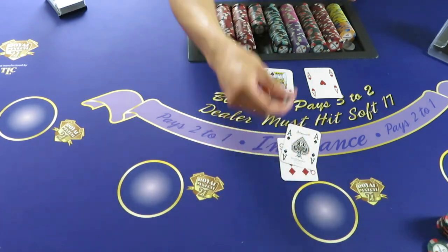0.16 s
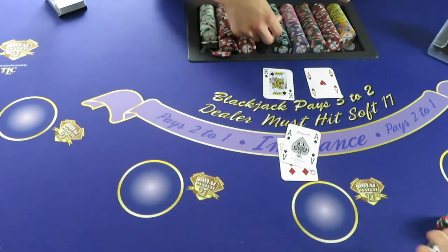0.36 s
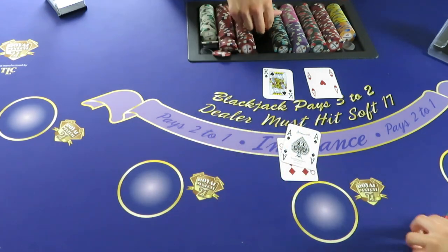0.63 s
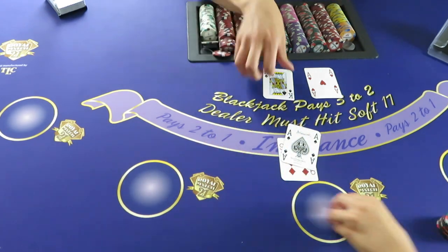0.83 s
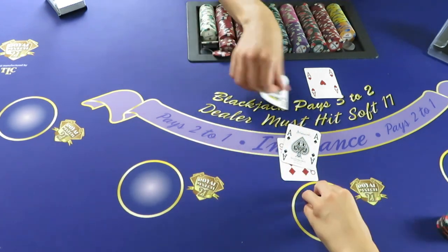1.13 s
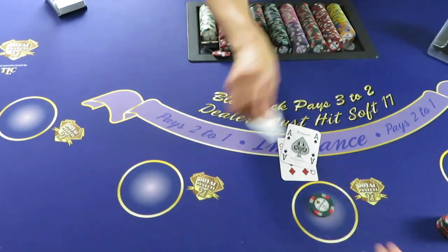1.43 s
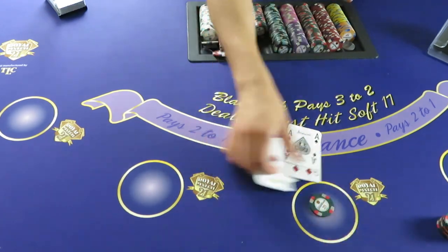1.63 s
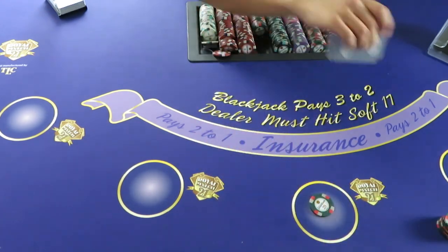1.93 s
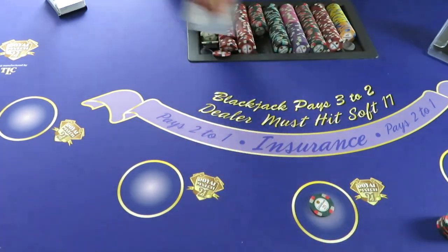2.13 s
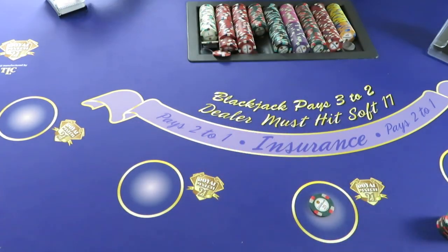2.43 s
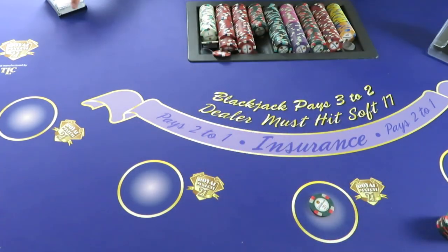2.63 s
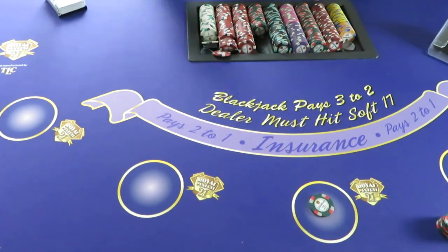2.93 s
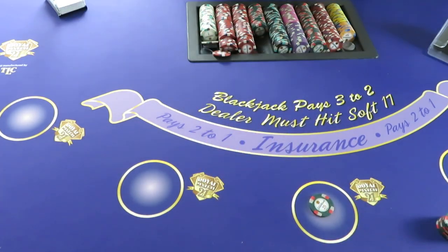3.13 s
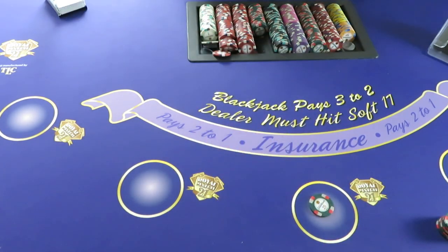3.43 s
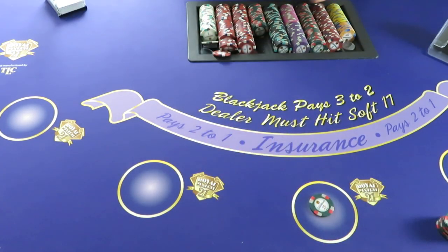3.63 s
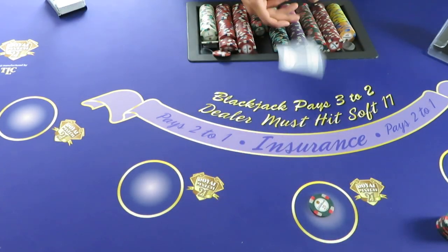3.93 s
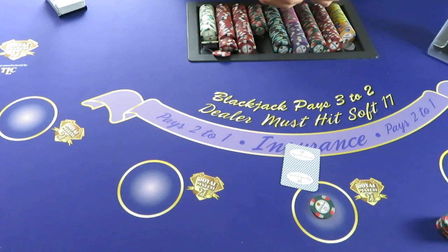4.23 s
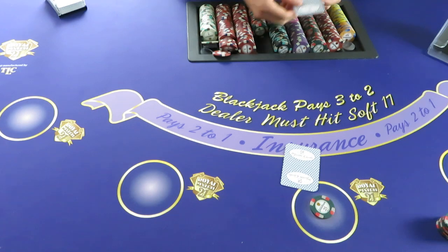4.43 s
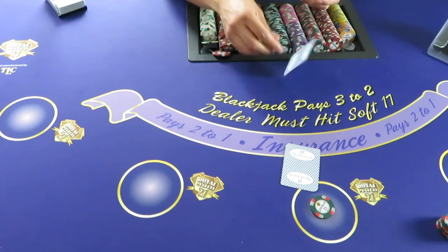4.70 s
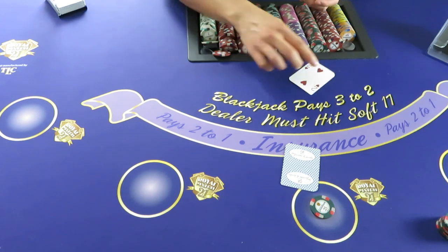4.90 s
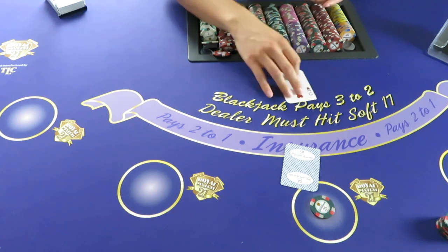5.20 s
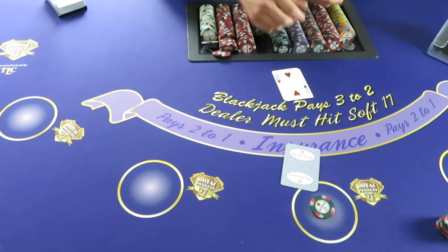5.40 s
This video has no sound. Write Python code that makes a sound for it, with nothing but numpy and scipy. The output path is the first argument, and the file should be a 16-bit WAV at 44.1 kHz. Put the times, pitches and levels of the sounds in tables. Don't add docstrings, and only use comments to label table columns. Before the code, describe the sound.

Close casino-table handling: clipped chip crash, papery card slides, bright ringing tray clack, a sharp card snap and soft card taps over faint ventilation.

```python
import sys
import numpy as np
from scipy import signal
from scipy.fft import rfft, irfft, next_fast_len
from scipy.io import wavfile
from scipy.ndimage import uniform_filter1d

SR = 44100
rng = np.random.default_rng(int(sys.argv[2]) if len(sys.argv) > 2 else 0)


def unload_audio(sound):
    columns = np.transpose(np.atleast_2d(sound))
    steps = np.round(np.clip(columns, -1, 1) * 32767)
    wavfile.write(sys.argv[1], SR, steps.astype(np.int16))


def boost(x):
    u = np.asarray(x, float) / 20
    return 10 ** u


N = 245107

# [t/s, peak level/dB, body f/Hz, rattle/ms]
BLOWS = [
    (.6831, 7, 660, 2.2),
    (.684, -29, 50, .5),
    (.611, -43, 240, 6.0),
    (.8185, -38, 300, 7.0),
]
# [f/Hz, level/dB, T60/s]
TABLE_MODES = [(200, -7, 0.4), (313, 1, 0.071), (540, -14.5, 0.05), (800, 0.5, 0.13)]


def curve(table, column=1, outside=None):
    rows = np.array(table)
    return np.interp(np.arange(N) / SR, rows[:, 0], rows[:, column], outside, outside)


def band(x, hz, width_hz):
    centre_hz = min(hz, .4 * SR)
    q = max(hz / width_hz, .3)
    return signal.lfilter(*signal.iirpeak(centre_hz, q, SR), x)


def colour(x, table):
    rows = np.array(table)
    size = next_fast_len(N)
    hz = np.maximum(np.fft.rfftfreq(size, 1 / SR), 1)
    gain = boost(np.interp(np.log(hz), np.log(rows[:, 0]), rows[:, 1]))
    return irfft(rfft(x, size) * gain)[..., :N]


def unit(x):
    return x / np.sqrt(np.mean(x ** 2))


def walk(rate_hz):
    hold = int(SR / rate_hz)
    levels = rng.standard_normal(N // 21 + 1)[:N // hold + 1]
    return unit(uniform_filter1d(np.repeat(levels, hold), hold)[:N])


def late(x, count):
    return np.pad(x, (count, 0))[:N]


def gain_db():
    # [t/s, depth/dB]
    ducks = [
        (.212, -1),
        (.604, 1),
        (.670, -17),
        (.80, -0.1),
        (2.46, -4),
        (2.812, 1.3),
        (4.206, -0.7),
    ]
    rest_db, duck_s, hold_s, recover_s = 0.5, .002, 0.076, 0.87
    since_s = np.arange(N) / SR - np.array(ducks)[:, :1]
    drop = np.clip(since_s / duck_s, 0, 1)
    recovery = np.exp(-np.maximum(since_s - hold_s, 0) / recover_s)
    return rest_db + np.array(ducks)[:, 1] @ (drop * recovery)


def knocks(table, width_share, share_per_ms, crack_2k_db, modes=(), ring_db=-20.):
    out, t = np.zeros(N), np.arange(6000) / SR
    before_gain_db = -gain_db()
    for s, db, hz, ms in table:
        width_hz = hz * (width_share + share_per_ms * ms)
        crack_db = crack_2k_db + 6.5 * np.log2(hz / 2000)
        grains = rng.standard_normal((3, len(t)))
        fade = np.exp(-1000 * t / max(ms, .05))
        body = min(ms, 1) * grains[0] * grains[1] * fade
        body[0] += 3.0
        for _ in range(3):
            body = band(body, hz, 2 * width_hz)
        crack = grains[2] * grains[1] * fade ** 2
        crack = band(band(crack, 10000, 7400), 10000, 9000)
        sound = body / np.abs(body).max() + boost(crack_db) * crack / np.abs(crack).max()
        i = int(s * SR)
        out[i:i + len(t)] += boost(db + before_gain_db[i + 40]) * sound
    ring = 0
    for hz, db, t60_s in modes:
        ring = ring + boost(db) * band(out, hz, np.log(1000) / np.pi / t60_s)
    return out + boost(ring_db + 3.8 * walk(70)) * ring


def air():
    # [f/Hz, density/dB]
    spectrum = [(20, -5), (40, -4.5), (80, -1), (141, -7.5), (280, -1.5), (390, -5.5), (540, -4.5),
                (900, -9), (1300, -9.5), (2100, -10.5), (3500, -14.5), (6000, -16.5), (10000, -25),
                (15000, -29)]
    steady = unit(colour(rng.standard_normal(N), spectrum))
    bass = band(steady, 60, 120)
    return boost(-58.5) * (steady + bass * (boost(2.3 * walk(6.6)) - 1))


def air_side():
    # [f/Hz, density/dB]
    spectrum = [(20, -25.5), (40, -12), (400, 1.5), (1000, -5.5), (2000, -9.5), (4000, -14), (8000, -21),
                (15000, -21)]
    hush = unit(colour(rng.standard_normal(N), spectrum))
    again = colour(late(hush, count=25), [(3000, -0.5), (7000, -5.5), (10000, -19)])
    return boost(-66.5) * (hush + again)


def drone():
    # [t/s, f/Hz, level/dB]
    engine = [(0, 84, -65.5), (.6, 86.5, -61), (.9, 89.9, -74.5), (1.3, 92.3, -72.5), (1.9, 93.2, -75),
              (2.2, 95, -65.5), (2.45, 93.3, -63), (2.72, 90.8, -60.5), (2.84, 82, -74), (3.0, 80, -72.5),
              (3.3, 75, -106)]
    hz = curve(engine) * (1 + 0.012 * walk(6.0))
    phase = 2 * np.pi * np.cumsum(hz) / SR
    level_db = curve(engine, column=2, outside=-120) - gain_db() + 0.66 * walk(8.2)
    return np.sqrt(2) * boost(level_db) * np.sin(phase)


def felt():
    # [t/s, level/dB]
    strokes = [
        [(0, -48.5), (.2, -50), (.26, -51), (.354, -62), (.44, -85.5)],
        [(1.2, -69), (1.264, -55), (1.39, -47), (1.43, -52.5), (1.5, -79.5)],
        [(1.555, -70), (1.595, -47.5), (1.65, -51.5), (1.78, -43.5), (1.88, -53.5), (1.93, -84)],
        [(5.15, -80), (5.18, -57), (5.26, -54.5), (5.45, -76)],
    ]
    # [scrape f/Hz, rustle level/dB, hiss level/dB]
    paper = [(2000, -1, -1.4), (2021, -18.5, -8.5), (2103, -14.5, -8), (2600, -14.5, -6.5)]
    # [t/s, level/dB]
    shoe_draw = [(2.95, -78), (3.1, -64.5), (3.5, -66.5), (3.9, -62), (4.0, -85)]
    hiss_hz, hiss_width_hz = 10500, 7500
    out = 0
    for stroke, (hz, rustle_db, hiss_db) in zip(strokes, paper):
        db = curve(stroke, outside=-120)
        grip = boost(2.2 * walk(60) + 1.1 * walk(300))
        scrape, rustle, hiss, drag = rng.standard_normal((4, N))
        drag = unit(band(drag, 920, 710))
        scrape = unit(band(band(scrape, hz, 1700), hz, 1700))
        rustle = unit(band(rustle, 5600, 2700))
        hiss = unit(band(band(hiss, hiss_hz, hiss_width_hz), hiss_hz, hiss_width_hz))
        out = out + boost(db - 13.5) * grip * drag
        out = out + boost(db - 6.0) * grip * scrape
        out = out + boost(db + rustle_db - 4.5) * grip * rustle
        out = out + boost(db + hiss_db - 8.0) * hiss
    shoe_db = curve(shoe_draw, outside=-120) + 1.9 * walk(3.93)
    shoe = unit(band(rng.standard_normal(N), 2080, 200)) * boost(shoe_db)
    return (out + shoe) / boost(gain_db())


def chips():
    # [t/s, peak level/dB, body f/Hz, rattle/ms]
    clicks = [(.217, -30, 6300, 16), (.2195, -25.5, 9700, 2.6), (.609, -26, 2730, 4.6),
              (.610, -34, 6600, 5), (.610, -29, 1550, 12), (.684, -13, 9500, 3), (.710, -38, 8000, 1),
              (.719, -36, 8000, 1), (.732, -29, 10000, 1.5), (.742, -19, 3500, 4.1), (.743, -16, 6900, 1.6),
              (.755, -29, 9000, 9)]
    # [f/Hz, level/dB, T60/s]
    chip_modes = [(5580, -9, 0.077), (5950, -2.5, 0.17), (6620, -0.5, .2)]
    return knocks(clicks, width_share=0.37, share_per_ms=.001, crack_2k_db=-15, modes=chip_modes, ring_db=7.0)


def table_blows():
    return knocks(BLOWS, width_share=1.1, share_per_ms=0, crack_2k_db=-20)


def rack():
    # [t/s, peak level/dB, body f/Hz, rattle/ms]
    drops = [(.677, -31, 2160, 3), (.6805, -29, 2170, 1.8), (.684, -11, 1900, 4.8), (.8078, -23, 2700, 1.6),
             (.686, -30, 340, 10), (.690, -19.5, 724, 22), (.694, -24, 2354, 82), (.8075, -12, 1170, .15),
             (.8185, -11.5, 1160, 0.37), (.8188, -20, 2900, 2.5), (.828, -24, 850, 4),
             (.826, -33, 2600, 24), (.850, -23.5, 1310, 0.77), (.871, -25, 1414, .4),
             (.878, -31, 1370, 4.9), (.92, -43.5, 1090, 11)]
    # [f/Hz, level/dB, T60/s]
    rack_modes = [(328, -13.5, 0.097), (546, -13.5, 0.11), (788.5, -6, 0.13), (1260, -8, 0.049),
                  (1534, -2.5, 0.057), (2140, 1.5, 0.036)]
    return knocks(drops, width_share=.4, share_per_ms=.008, crack_2k_db=-36, modes=rack_modes, ring_db=-2.5)


def cards():
    # [t/s, peak level/dB, body f/Hz, rattle/ms]
    landings = [(1.385, -46, 1488, 5.6), (1.36, -63, 143.5, 22), (1.640, -52, 70, 27),
                (1.945, -49, 2000, 12.3), (3.085, -57, 9240, 3), (3.844, -52, 8730, 1.7),
                (3.949, -39, 1800, 3), (4.134, -51, 1300, 4.7), (4.157, -38, 1800, 12),
                (4.159, -48, 11000, .82), (4.189, -53, 2680, 4.2), (4.310, -58, 10000, 14),
                (4.430, -40.5, 2500, .94), (4.449, -48, 1620, 21), (4.500, -44, 2480, 7.3),
                (4.707, -37, 1800, 8), (4.708, -43.5, 493, 18), (4.818, -48.5, 200, 56),
                (4.926, -40.5, 1300, 7.7), (4.927, -42, 640, 21), (5.164, -46, 2335, 1.1),
                (5.179, -45, 2350, 4.5), (5.395, -44.5, 2510, 3)]
    return knocks(landings, width_share=0.73, share_per_ms=.001, crack_2k_db=-12.5,
                  modes=TABLE_MODES, ring_db=3.5)


def snaps():
    # [t/s, peak level/dB, body f/Hz, rattle/ms]
    flicks = [
        (1.748, -22.5, 1850, 0.45),
        (4.2122, -11, 2340, 0.1),
        (4.212, -41, 700, 2.9),
        (4.2187, -26, 2400, .08),
        (4.222, -33, 4300, 5),
    ]
    return knocks(flicks, width_share=.37, share_per_ms=0.011, crack_2k_db=-30, modes=TABLE_MODES, ring_db=1.0)


def tray():
    # [t/s, peak level/dB, body f/Hz, rattle/ms]
    clacks = [(2.460, -32.5, 2860, 42), (2.477, -11, 2180, 3), (2.479, -28, 1350, 7.5),
              (2.480, -50, 395, 6.4), (2.482, -6.5, 3150, 1.33), (2.482, -16.5, 9000, 2.2),
              (2.490, -37.5, 7500, 34), (2.494, -25, 1247, 3.7), (2.494, -27, 2920, 3),
              (2.488, -21.5, 4340, 35), (2.502, -31, 4700, 22), (2.820, -21.5, 2930, 4.5),
              (2.821, -39.5, 4500, 24), (2.822, -38, 1094, 10.4), (2.850, -49, 1040, 9)]
    # [f/Hz, level/dB, T60/s]
    tray_modes = [(1037, -1.5, 0.35), (1293, 1.5, 0.17), (1630, -15, 0.287), (2094, -2.5, 0.07),
                  (2950, -7.5, 0.087), (3150, -9.5, 0.15), (2698, -36.5, 0.28), (3780, -7, 0.139),
                  (4360, -1.5, 0.14), (5060, -10, 0.132)]
    return knocks(clacks, width_share=0.26, share_per_ms=0.0099, crack_2k_db=-31,
                  modes=tray_modes, ring_db=10.5)


def room(x, wet_db):
    # [f/Hz, T60/s]
    decays = [(125, 0.35), (250, 0.32), (500, .33), (1000, .35), (2000, 0.25), (4000, 0.29), (8000, 0.22),
              (14000, 0.52)]
    t = np.arange(int(.8 * SR)) / SR
    tail = 0
    for hz, t60_s in decays:
        tail = tail + band(rng.standard_normal(len(t)), hz, 1.354 * hz) * boost(-60 * t / t60_s)
    tail *= np.minimum(t / 0.011, 1)
    return boost(wet_db) * signal.fftconvolve(x, tail / np.sqrt(np.sum(tail ** 2)))[:N]


def early_scatter(x):
    scatter = rng.standard_normal(300) * np.exp(-np.arange(300) / 60)
    return signal.fftconvolve(x, scatter / np.sqrt(np.sum(scatter ** 2)))[:N]


def scene():
    # [f/Hz, level/dB]
    room_colour = [(100, 2.5), (1000, -0.8), (4000, -4), (7000, -3), (8500, -21), (15000, -26.5)]
    near = felt() + chips() + rack() + cards() + snaps() + tray()
    slant = room(near, wet_db=-11.0) + boost(2.5) * early_scatter(near)
    slant = colour(slant, [(300, -31), (1000, -26.5), (2500, -25.0), (5000, -15.5), (12000, -12.5)])
    reflected = colour(room(near, wet_db=-11.0), room_colour)
    middle = table_blows() + near + reflected + air() + drone()
    return np.array([middle, air_side() + slant])


def roll_off(x):
    return signal.sosfilt(signal.butter(12, 17930, fs=SR, output="sos"), x)


def record(dry):
    overload_db, far_headroom, far_lag_samples, top_hz = -10.5, 1.4, 166, 15150
    gain = gain_db()
    top = boost(overload_db - gain[int(BLOWS[0][0] * SR)])
    close = colour(dry[0], [(30, 6.5), (3000, -1.5), (7000, -11.0), (8500, -14), (14000, -9.0)])
    close = np.clip(close, -top, top)
    far = late(np.clip(dry[0], -far_headroom * top, far_headroom * top), count=far_lag_samples)
    far = colour(far, [(30, -18), (300, -4), (3000, -6.5), (7000, -9.0), (12500, -3.0), (15000, -10.5)])
    hiss = boost(-62.5) * colour(rng.standard_normal(N), [(500, -25.5), (4000, -7.5), (15000, -18)])
    mid = close + far + hiss
    side = late(dry[1], count=far_lag_samples)
    pair = boost(gain) * np.array([mid + side, mid - side])
    pair = signal.sosfilt(signal.ellip(6, .5, 30, top_hz, fs=SR, output="sos"), pair)
    return roll_off(pair)


dry = scene()
out = record(dry)
unload_audio(out)
```